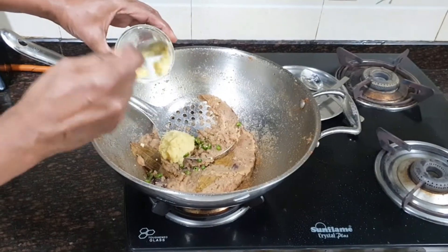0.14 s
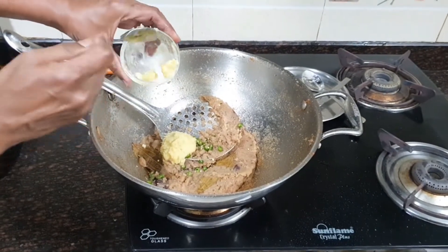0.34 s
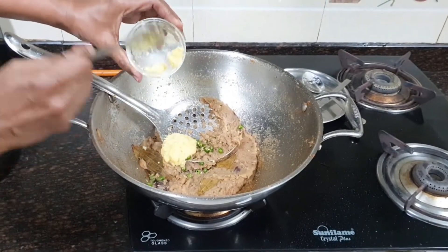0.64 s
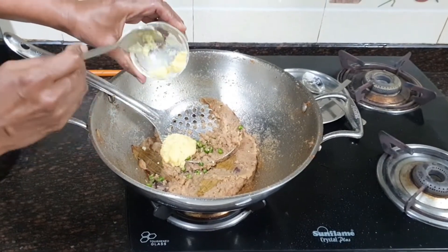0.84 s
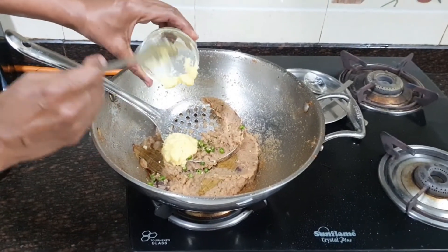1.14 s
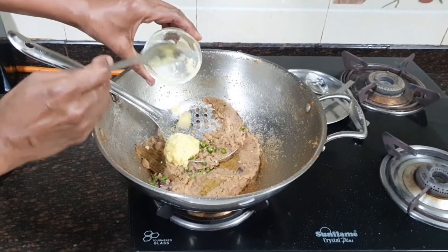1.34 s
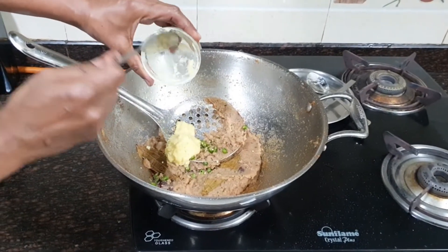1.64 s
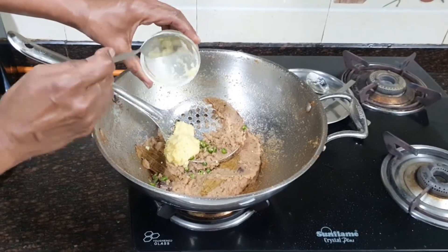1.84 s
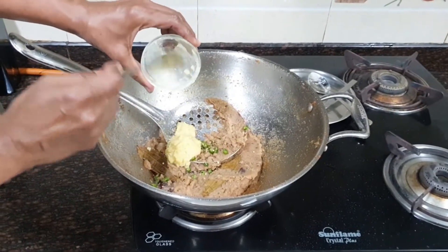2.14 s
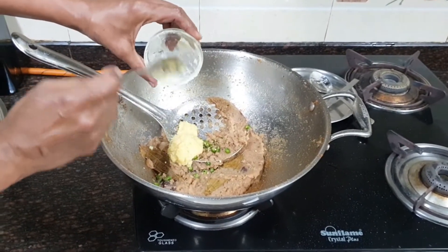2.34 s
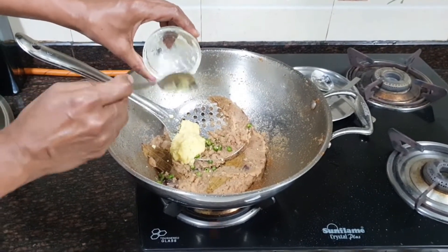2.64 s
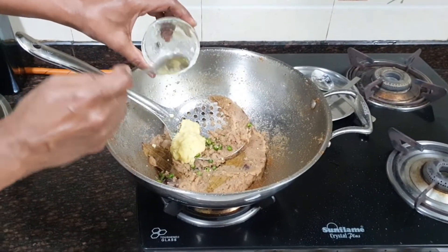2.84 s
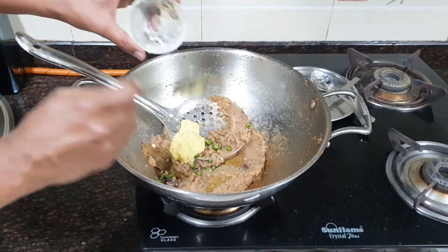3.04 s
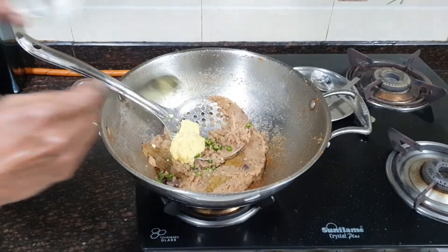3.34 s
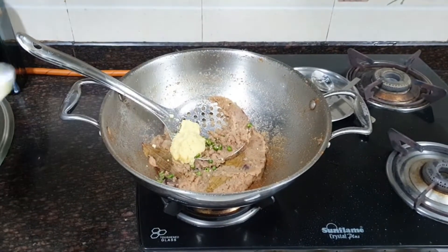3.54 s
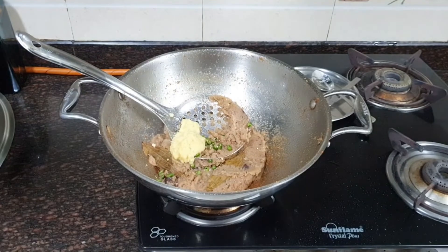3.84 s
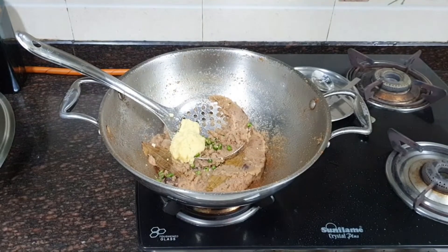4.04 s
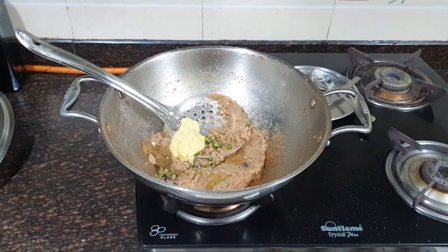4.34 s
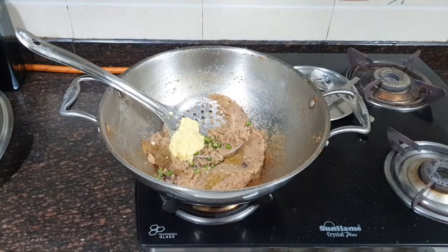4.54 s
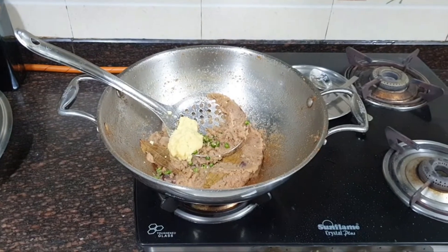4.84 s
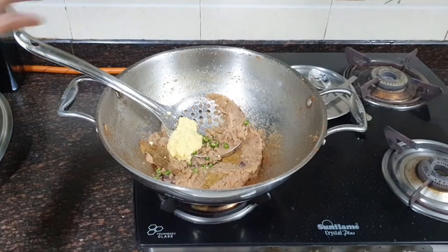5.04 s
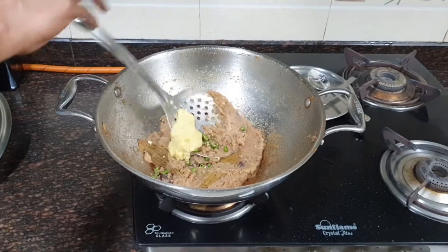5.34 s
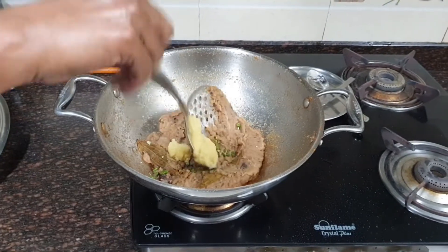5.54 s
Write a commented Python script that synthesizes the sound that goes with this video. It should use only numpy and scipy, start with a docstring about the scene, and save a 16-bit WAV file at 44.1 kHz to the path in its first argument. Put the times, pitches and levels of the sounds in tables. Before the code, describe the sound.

A close stereo view of cooking in a small tiled kitchen with a short, bright room tail. A quiet gas burner rumbles and hisses throughout, with very faint random oil crackles. From 0.1 to 2.95 s a steel spoon strikes and scrapes a hand-held glass bowl about thirty times, in irregular pairs and clusters: some clacks dull and pressed, others freer with a high glassy ring near 7 kHz, all short and finger-damped, with little scratchy edges. A faint wet smear of paste lies beneath, fading by 3.35 s. Then mostly flame and sparse spits, with a soft low thud around 3.75 s. At 4.6 to 4.8 s the thick bowl knocks dully on stone, slides with small glassy scrapes and rocks to rest, weakening to about 4.9 s. From about 5.2 s a spatula pushes grainy wet paste, rubbing the damped steel pan by 5.6 s with one tiny squeak near 5.67 s.

```python
"""Spoon in a glass bowl over a pan

A steel spoon scrapes paste out of a small hand-held glass bowl in a tiled kitchen. Clinks are struck resonances;
the fingers damp the glass, so each is short and the room carries the tail. The smeared paste is a stream of grains.
The bowl knocks and slides on the counter, then a spatula, more grains, pushes through paste in the steel pan.
A gas burner of coloured noise and a faint sizzle of random clicks run underneath."""
import sys
import numpy as np
from scipy import signal
from scipy.fft import rfft, irfft, next_fast_len
from scipy.io import wavfile

SR = 44100
rng = np.random.default_rng(int(sys.argv[2]) if len(sys.argv) > 2 else 0)


def dump(signal):
    """Clip the signal to [-1, 1] and save it as 16-bit WAV at the path in sys.argv[1]."""
    limited = np.clip(np.atleast_2d(signal).T, -1, 1)
    pcm = np.round(limited * 32767).astype(np.int16)
    wavfile.write(sys.argv[1], SR, pcm)


N = 251193  # scene length in samples
HIT_SIZE = 4096  # length of one contact in samples

# Burner rumble level over time: start_s, level_db
FLAME_LEVEL = [(0, -49.5), (1.4, -46), (2.2, -47), (3.6, -46.5), (4.6, -48), (5.7, -47.5)]
# Burner colours: pitch_hz, level_db
RUMBLE_COLOUR = [(20, -19), (33, -30), (42, -7), (52, 2.5), (63, -3), (85, -5.5), (115, -5.5), (142, -17),
                 (180, -10.5), (240, -15.5), (310, -15.5), (430, -20.5), (900, -62)]
HISS_COLOUR = [(240, -30.5), (400, -7.5), (489, -4.5), (545, -4.5), (645, -2.5), (921, -8), (1090, -6),
               (1560, -4.5), (2250, -2.5), (2670, -8), (4180, -8.5), (9470, -14.5), (11900, -12),
               (16000, -14.5)]
HISS_DB = -46
# Left-right likeness of the burner noise: pitch_hz, likeness_0_to_1
EAR_LIKENESS = [(40, 1), (90, 0.89), (180, 0.83), (350, 0.29), (700, 0), (16000, 0)]

# Kitchen decay: pitch_hz, t60_s
ROOM_T60 = [(500, 0.17), (1600, 0.2348), (4000, 0.2374), (7500, 0.3264), (14000, 0.1051)]
# Kitchen tone: pitch_hz, level_db
ROOM_COLOUR = [(500, 4), (1500, -0.5), (3000, 2), (5000, 0.5), (7000, -5), (10000, -3.5), (15000, 2)]

# Oil spits in the pan: start_s, level_db
SPITS = [(3.23, -52.5), (3.801, -53.5), (4.266, -49.5), (5.329, -47), (5.457, -46)]
# Wet paste colour: pitch_hz, level_db
PASTE_COLOUR = [(200, -27), (600, -1), (1500, -2), (2500, -5), (5000, -5.5), (7000, -7.5), (16000, -12)]

# The spatula leans into the paste: start_s, level_db
PUSH_LEVEL = [(5.15, -84), (5.32, -50.5), (5.5, -43.5), (5.7, -44)]
# Damped steel pan resonances: pitch_hz, width_hz, level_db
PAN_MODES = [(690, 170, -8), (984, 120, 1), (1390, 430, -6), (1920, 700, -2)]
# The blade sinks until it rubs the pan; its level is relative to the paste
STEEL_DB, STEEL_TOUCH_S, STEEL_RISE_DB_PER_S = -0.5, 5.58, 70.0

# The bowl lands on the counter: start_s, level_db
KNOCKS = [(4.613, -26), (4.626, -28.5), (4.696, -31)]
# Its foot slides on the stone: start_s, level_db, length_s
SLIDES = [(4.59, -37, 0.018), (4.695, -32.5, 0.013), (4.753, -37.5, 0.045)]
# Dull knock of the thick glass: pitch_hz, level_db
DULL_KNOCK_COLOUR = [(300, -29.5), (600, -15.5), (1000, -8.5), (1400, -6), (1850, 1), (2800, -3),
                     (3600, -10), (4700, -15.5), (6000, -31), (12000, -30)]
# Rocking touches: basic gap, level of the first, loss from each touch to the next
ROCK_GAP_S, ROCK_DB, ROCK_LOSS_DB = 0.024, -39.5, 2.5

# Smeared paste: level at the start, fall as the bowl empties, ring of the bowl relative to the paste
SMEAR_DB, SMEAR_FALL_DB_PER_S, SMEAR_RING_DB = -53, 1, -1.5
SMEAR_END_S, SMEAR_RELEASE_S = 3.35, 0.2

# Spoon against glass: start_s, strength_db, clack_over_ring_db, edge_bite_db, contact_length_s
CLINKS = [(0.121, -32, -6.5, 1, 0.0029), (0.2337, -44.5, -0.5, -2, .005), (0.377, -55, 4, 14, 0.0014),
          (0.4221, -32.5, -0.5, 9, 0.01), (0.545, -29, 11, 5.5, 0.0023), (0.637, -31, 2, 6, 0.002),
          (0.663, -27, -2, 4.5, 0.0032), (0.785, -27.5, 10.5, 1.5, 0.0046), (0.932, -36.5, 5.5, 7, 0.00076),
          (1.058, -24, -5.5, -9, 0.00043), (1.205, -29.5, 2, 2.5, 0.0021), (1.3029, -24, -8, -16, 0.0003),
          (1.4787, -29, 3.5, 2.5, 0.0015), (1.5456, -25.5, -8.5, -6, 0.0014),
          (1.696, -29.5, -9, 5.5, 0.0024), (1.7163, -31, -3, 6, 0.0022), (1.765, -30, 6, 5, 0.00078),
          (1.791, -35.5, 9, 10, 0.0022), (1.927, -30, -6.5, 0.5, 0.0082), (1.9783, -37.5, 3, -8, .0007),
          (2.1974, -29, -7, 2, 0.0015), (2.222, -34, -1.5, 3, 0.0019), (2.264, -30.5, 5.5, 10, 0.0011),
          (2.424, -32, 3.5, -2, 0.0026), (2.4825, -27.5, -6, 1, 0.0034), (2.702, -26, 0.5, 4, 0.00077),
          (2.7092, -29.5, -3, -16, 0.00066), (2.9153, -25.5, 1, -0.5, 0.00086),
          (2.924, -28.5, -5.5, -3, .003), (2.94, -33.5, -4, 6, .001)]
# Spoon and bowl resonances, low to high: pitch_hz, width_hz, level_db
SPOON_MODES = [(830, 310, -20), (1143, 230, -3.5), (1327, 660, -2), (1886, 330, -1.5), (2254, 470, -4)]
GLASS_LOW_MODES = [(2693, 160, -2), (2830, 95, -1), (2890, 200, -1.5), (3120, 360, -4)]
GLASS_MID_MODES = [(3630, 410, 0), (4170, 530, 0)]
GLASS_HIGH_MODES = [(7140, 47, -9), (7136, 135, 1), (7540, 390, -6.5), (8350, 100, -19)]
GLASS_TOP_MODES = [(9100, 320, -3), (10420, 840, 0.5), (12900, 140, -2.5), (14000, 910, -6),
                   (15200, 1000, -8)]
# Scratch of an edge on glass or stone: pitch_hz, level_db
SCRATCH_COLOUR = [(300, -44), (700, -13.5), (2000, -7), (3300, -6), (4200, 1), (5200, -1), (6300, -1.5),
                  (8000, -5), (9200, -13.5), (16000, -10)]
# Clink mix, relative to its strength; thock is the dull body of the clack
CLACK_DB, THOCK_DB, TICK_DB, SCRATCH_DB, LEAD_IN_DB = -7.5, -13.5, -8, -4, -12
LOW_RING_DB, MID_RING_DB, HIGH_RING_DB = -1.67, -9.5, -0.2
LOW_DAMPING, HIGH_DAMPING = 0.051, 0.46  # dB of glass ring lost per dB of clack
SCRATCH_PER_BITE = 0.34  # dB of scratch per dB of bite
LEAD_IN_S = 0.0069


def from_db(db):
    """Turn decibels into linear amplitude gain."""
    return 10 ** (np.asarray(db) / 20)


def rms_one(x):
    """Scale a signal to an rms of 1."""
    return x / np.sqrt(np.mean(x ** 2) + 1e-20)


def at_hz(points, hz):
    """Read a frequency table on a logarithmic pitch axis."""
    table_hz, value = np.transpose(points)
    return np.interp(np.log(np.maximum(hz, 1)), np.log(table_hz), value)


def coloured(x, spectrum):
    """Shape the tone with a minimum-phase filter, so nothing sounds ahead of its cause."""
    size = 2 * next_fast_len(x.shape[-1])
    gain = from_db(at_hz(spectrum, np.fft.rfftfreq(size, 1 / SR)))
    cepstrum = irfft(np.log(gain))
    # folding the cepstrum onto positive time gives minimum phase
    cepstrum[1:size // 2] *= 2
    cepstrum[size // 2 + 1:] = 0
    response = np.exp(rfft(cepstrum))
    return irfft(rfft(x, size) * response)[..., :x.shape[-1]]


def drift(rate):
    """Wander at random between normal knots of spread 1, with rate knots per second."""
    knots = rng.standard_normal(int(rate * N / SR) + 2)
    return np.interp(np.arange(N) / SR * rate, np.arange(len(knots)), knots)


def contact(length, grit):
    """Force of a first touch, then a dying flurry of tiny slips; length is the decay time in s."""
    t = np.arange(HIT_SIZE) / SR
    force = grit * rng.standard_normal(HIT_SIZE) * np.exp(-t / max(length, 1e-4))
    force[0] += 1
    return force


def struck(force, modes, spread_db, detune):
    """Ring the modes; grip and touching point shift their pitch and strength on every call."""
    out = 0
    for hz, width, db in modes:
        radius = np.exp(-np.pi * width / SR)
        angle = 2 * np.pi * hz * (1 + detune * rng.normal()) / SR
        ring = signal.lfilter([1, 0, -1], [1, -2 * radius * np.cos(angle), radius ** 2], force)
        gain = from_db(db + spread_db * rng.normal())
        out = out + rms_one(ring) * gain * rng.choice([-1, 1])
    return out


def grains(per_s, spread_db):
    """Scatter random clicks of uneven size and either polarity."""
    size_db = spread_db * np.minimum(rng.exponential(1, N), 5)
    sizes = from_db(size_db) * rng.choice([-1, 1], N)
    return sizes * (rng.random(N) < per_s / SR)


def stereo_noise(spectrum):
    """Diffuse noise, alike in both ears only in the bass."""
    alike = np.clip(at_hz(EAR_LIKENESS, np.fft.rfftfreq(N, 1 / SR)), 0, 1)
    mid, side = rfft(rng.standard_normal((2, N)))
    pair = np.sqrt(1 + alike) * mid + np.sqrt(1 - alike) * side * [[1], [-1]]
    return rms_one(coloured(irfft(pair, N), spectrum))


def add(track, start_s, sound, db, left_db=0):
    """Place a short sound with scatter off hand and pan; its energy equals 30 ms at the given level."""
    t = np.arange(HIT_SIZE // 4) / SR
    paths = from_db(-17.0) * rng.standard_normal((2, len(t))) * from_db(-60 * t / 0.029)
    paths[:, :1] += 1  # direct sound
    paths[1] = np.pad(paths[1], (12, 0))[:len(t)]  # the right ear is 12 samples farther away
    pair = signal.fftconvolve(sound[None], paths, axes=1)
    energy = np.sum(pair ** 2, axis=1, keepdims=True)
    pair = pair * np.sqrt(0.03 * SR / energy)
    gain = from_db(db + left_db * np.array([[0.5], [-0.5]]))  # left_db is left over right
    at = int(start_s * SR)
    track[:, at:at + pair.shape[1]] += (gain * pair)[:, :N - at]


def kitchen(x, wet_db):
    """Tiles throw the sound back as a diffuse tail, with its own decay time in each band."""
    t = np.arange(SR // 2) / SR
    hz = np.fft.rfftfreq(len(t), 1 / SR)
    centres = np.geomspace(400, 16000, num=10)
    white = rfft(rng.standard_normal((2, len(t))))
    response = 0
    for own, centre in zip(np.eye(len(centres)), centres):
        band = irfft(white * np.interp(hz, centres, own), len(t))
        decay_db = -60 * t / at_hz(ROOM_T60, centre)
        response = response + band * from_db(at_hz(ROOM_COLOUR, centre) + wet_db + decay_db)
    build_up = np.clip((t - 0.003) / 0.0066, 0, 1)
    return x + signal.fftconvolve(x, response * build_up, axes=1)[:, :N]


def burner():
    """The flame rumbles and hisses as coloured noise; once a low sine swells into a soft thud."""
    t = np.arange(N) / SR
    thud = from_db(-36.5) * np.sin(2 * np.pi * 53 * t) * np.exp(-((t - 3.745) / 0.04) ** 2)
    hiss = from_db(HISS_DB + 1.5 * drift(8)) * stereo_noise(HISS_COLOUR)
    rumble = from_db(np.interp(t, *np.transpose(FLAME_LEVEL))) * stereo_noise(RUMBLE_COLOUR)
    return rumble + hiss + thud


def sizzle():
    """Tiny bubbles burst in the oil as random clicks, with a louder spit now and then."""
    bubbles = np.array([grains(per_s=300, spread_db=4.2) for ear in range(2)])
    out = from_db(-57.5) * rms_one(coloured(bubbles, PASTE_COLOUR))
    for start_s, db in SPITS:
        spit = coloured(contact(length=0.0025, grit=0.9), [(500, -6), (3000, -3), (16000, -11)])
        add(out, start_s, spit, db)
    return out


def spatula():
    """Wet grains drag under the blade, which sinks to rub the pan's damped modes and squeaks once."""
    t = np.arange(N) / SR
    push_db = np.interp(t, *np.transpose(PUSH_LEVEL), left=-np.inf)  # silent until the first push
    push = from_db(push_db + 2.1 * drift(29.96))
    drag = np.array([grains(per_s=5000, spread_db=-1.0) for ear in range(2)])
    paste = rms_one(coloured(drag, PASTE_COLOUR))
    steel_db = STEEL_DB - STEEL_RISE_DB_PER_S * np.maximum(STEEL_TOUCH_S - t, 0)
    ring = np.array([struck(d, PAN_MODES, spread_db=0.5, detune=0.004) for d in drag])
    out = push * (paste + from_db(steel_db) * rms_one(ring))
    squeak_modes = [(4660, 410, 1), (5550, 450, -5)]
    squeak = struck(contact(length=0.0028, grit=0.8), squeak_modes, spread_db=5, detune=0.005)
    add(out, 5.668, squeak, -41)
    return out


def rocking(count):
    """Ever weaker touches as the bowl rocks after its last knock, as rows of start_s, level_db."""
    k = np.arange(count)
    start_s = KNOCKS[-1][0] + ROCK_GAP_S * (k + 1 + rng.uniform(-0.18, 0.27, count))
    return list(zip(start_s, ROCK_DB - ROCK_LOSS_DB * k))


def bowl_set_down():
    """The thick base knocks dully on stone and rocks to rest; short slides make the glass ring."""
    out = np.zeros((2, N))
    for start_s, db in KNOCKS + rocking(count=8):
        add(out, start_s, coloured(contact(length=0.0081, grit=0.18), DULL_KNOCK_COLOUR), db)
    for start_s, db, length in SLIDES:
        force = contact(length, grit=0.38)
        low_ring = struck(force, GLASS_LOW_MODES, spread_db=4.0, detune=0.022)
        body = struck(force, SPOON_MODES, spread_db=1.0, detune=0.037)  # shares the spoon's modes
        high_ring = struck(force, GLASS_HIGH_MODES, spread_db=10, detune=0.0064)
        add(out, start_s, low_ring, db)
        add(out, start_s, body, db - 6.5)
        add(out, start_s, high_ring, db - 6.5, left_db=-4)
        add(out, start_s, coloured(force, SCRATCH_COLOUR), db - 5.5)
    return out


def smear():
    """Soft paste drags in fits and starts, barely stirring the glass, until the spoon is lifted out."""
    t = np.arange(N) / SR
    touching = np.clip((SMEAR_END_S - t) / SMEAR_RELEASE_S, 0, 1)
    push = touching * from_db(SMEAR_DB - SMEAR_FALL_DB_PER_S * t + 2.1 * drift(24.45))
    drag = np.array([grains(per_s=2000, spread_db=2.0) for ear in range(2)])
    modes = SPOON_MODES + GLASS_LOW_MODES + GLASS_HIGH_MODES
    ring = np.array([struck(d, modes, spread_db=2.5, detune=0.005) for d in drag])
    paste = rms_one(coloured(drag, PASTE_COLOUR))
    return push * (from_db(SMEAR_RING_DB) * rms_one(ring) + paste)


def spoon_on_glass():
    """A pressed spoon clacks and damps the glass, a free tap lets it ring; a biting edge ticks and scratches."""
    out = np.zeros((2, N))
    for start_s, db, clack_db, bite_db, length in CLINKS:
        force = contact(length, grit=0.32)
        clack = struck(force, SPOON_MODES, spread_db=1.5, detune=0.023)
        low_ring = struck(force, GLASS_LOW_MODES, spread_db=0.5, detune=0.02)
        mid_ring = struck(force, GLASS_MID_MODES, spread_db=3.0, detune=0.041)
        high_ring = struck(force, GLASS_HIGH_MODES, spread_db=6, detune=0.008)
        tick = struck(force, GLASS_TOP_MODES, spread_db=4.5, detune=0.0084)
        low_db = db - LOW_DAMPING * clack_db
        high_db = db - HIGH_DAMPING * clack_db
        add(out, start_s, clack, db + CLACK_DB + clack_db, left_db=1.0)
        add(out, start_s, coloured(force, DULL_KNOCK_COLOUR), db + THOCK_DB + clack_db)
        add(out, start_s, low_ring, low_db + LOW_RING_DB, left_db=1.5)
        add(out, start_s, mid_ring, high_db + MID_RING_DB, left_db=-1.0)
        add(out, start_s, high_ring, high_db + HIGH_RING_DB, left_db=-3.0)
        add(out, start_s, tick, db + TICK_DB + bite_db, left_db=-2.0)
        edge_db = db + SCRATCH_PER_BITE * bite_db
        scratch = coloured(contact(length, grit=1.0), SCRATCH_COLOUR)
        add(out, start_s, scratch, edge_db + SCRATCH_DB, left_db=-2.5)
        # a short, faint swell of noise leads into each clink: a contact reversed in time
        lead_in_force = contact(LEAD_IN_S, grit=1)[:HIT_SIZE // 8][::-1]
        lead_in = coloured(lead_in_force, SCRATCH_COLOUR)
        add(out, start_s - len(lead_in) / SR, lead_in, edge_db + LEAD_IN_DB)
    return out


def scene():
    """The handling and sizzle sound through the kitchen; the burner is added without its tail."""
    handling = sizzle() + spatula() + bowl_set_down() + smear() + spoon_on_glass()
    return burner() + kitchen(handling, wet_db=-30.0)


def record(dry):
    """The sharpest peaks are rounded, and the top of the band is cut steeply."""
    rounded = dry / (1 + (dry / 0.9) ** 6) ** (1 / 6)
    # order 12, 0.1 dB ripple, 80 dB stopband, cutoff in Hz
    top_cut = signal.ellip(12, 0.1, 80, 15900, fs=SR, output="sos")
    return signal.sosfilt(top_cut, rounded)


dry = scene()
out = record(dry)
dump(out)
```